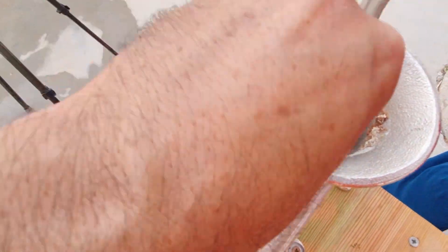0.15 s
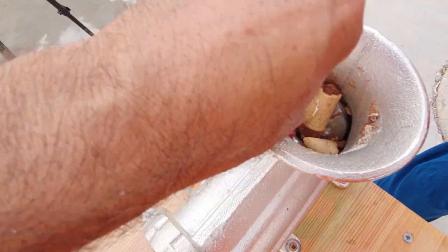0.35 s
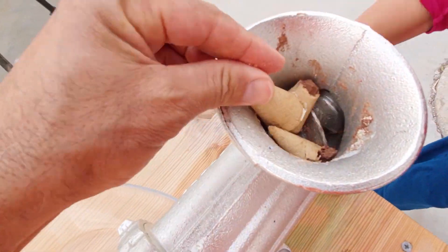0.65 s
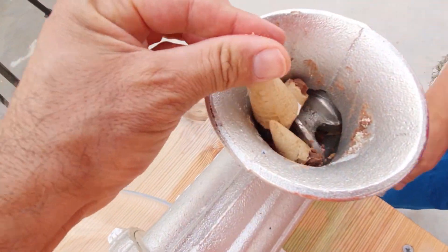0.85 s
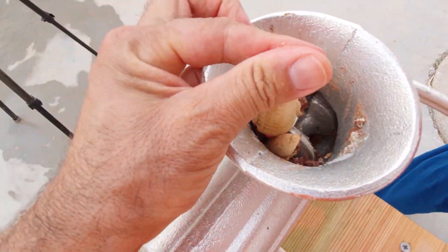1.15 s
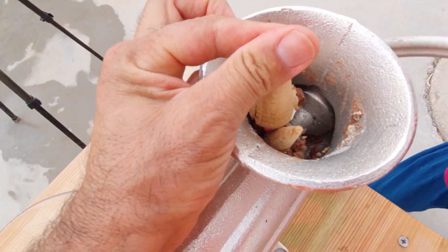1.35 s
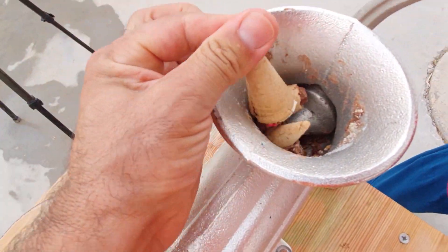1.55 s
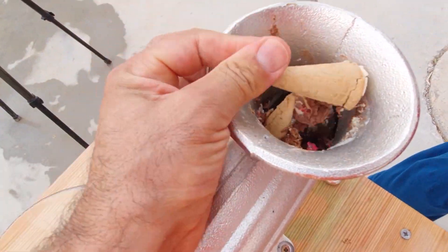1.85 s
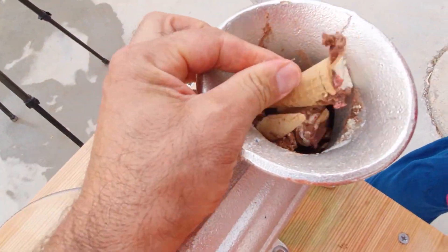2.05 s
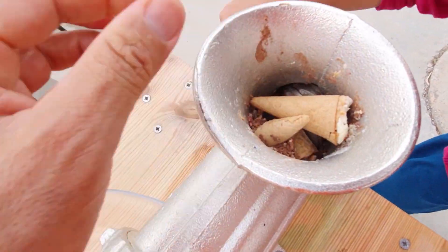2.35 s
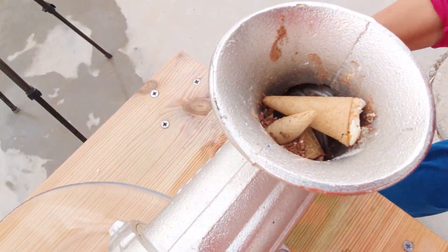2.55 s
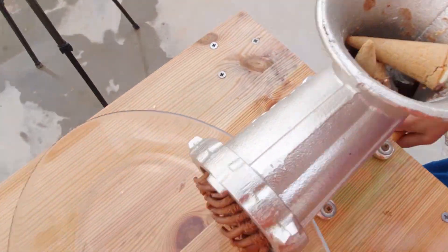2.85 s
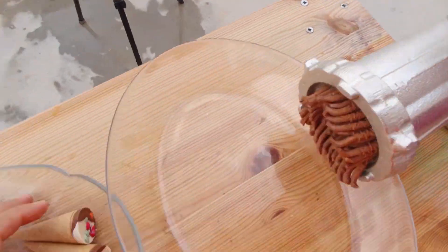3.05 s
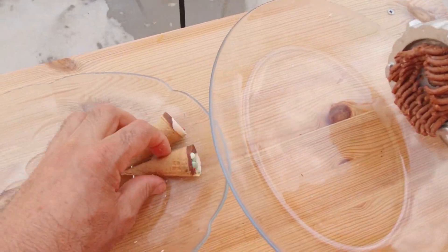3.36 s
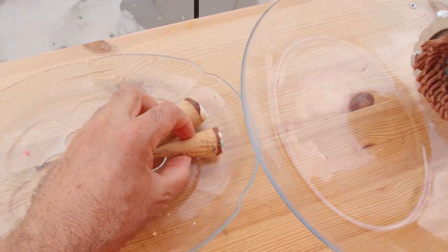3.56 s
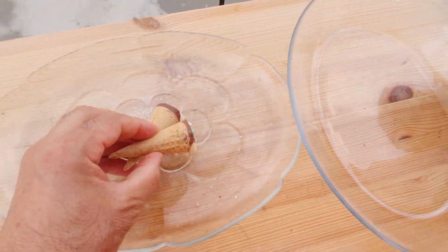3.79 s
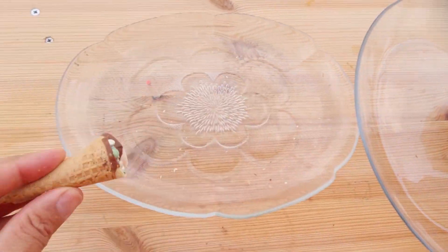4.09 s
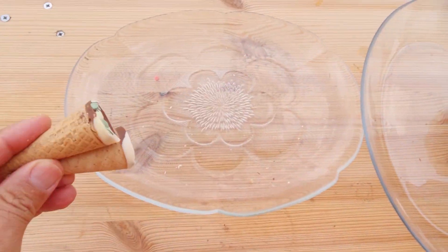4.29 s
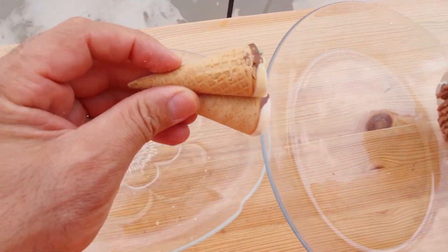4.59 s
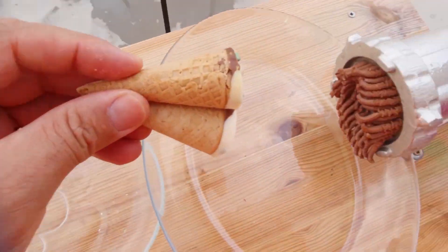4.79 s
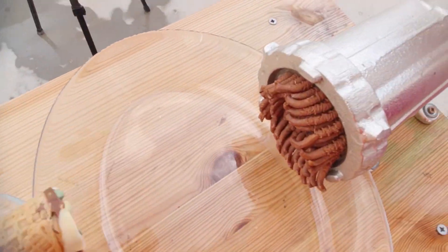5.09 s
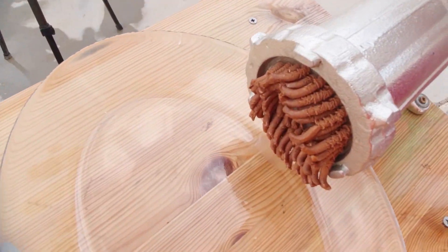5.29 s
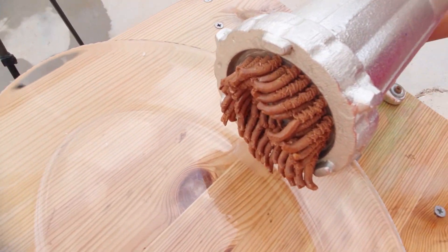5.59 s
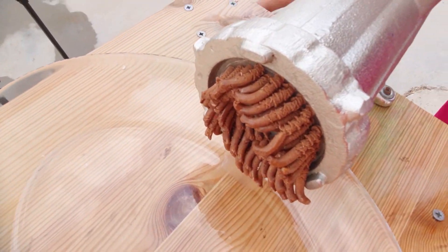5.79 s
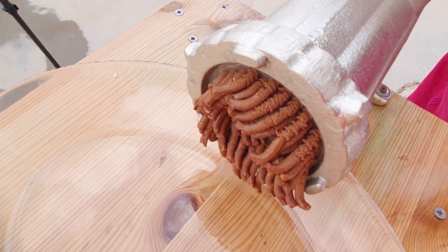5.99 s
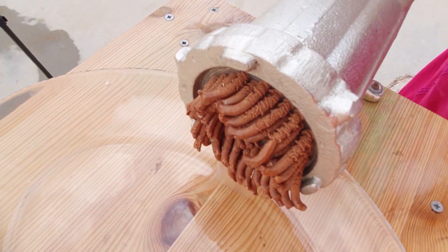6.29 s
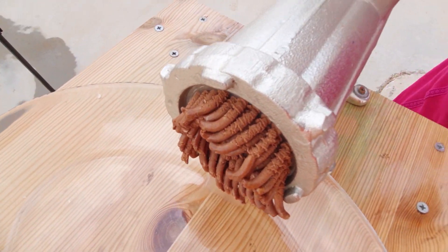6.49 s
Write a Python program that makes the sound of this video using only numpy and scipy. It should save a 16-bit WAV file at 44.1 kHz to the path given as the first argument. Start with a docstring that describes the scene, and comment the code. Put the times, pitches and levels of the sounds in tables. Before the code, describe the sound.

Close, dry crackling of wafers crushed by a metal auger, a cone dropping, table thumps and glass knocks, then a burst of dense crunches.

```python
"""At a wooden table, close to the microphone, wafer cones are fed into a clamped, hand-cranked metal meat grinder.
Slipping noise through metal resonances makes the auger rub in chocolate paste; crumbs are clustered noise grains
and snapping wafer walls are millisecond bursts. A cone drops into the hopper and a hand bumps the table while
taking more cones from a glass plate: pushes ringing sets of modes, with rasps, squeaks and shaped noise.
Slow swells of low noise are puffs of air on the microphone."""
import sys
import numpy as np
from scipy import signal
from scipy.fft import rfft, irfft
from scipy.io import wavfile
from scipy.ndimage import uniform_filter1d

SR = 44100
rng = np.random.default_rng(int(sys.argv[2]) if len(sys.argv) > 2 else 0)


def generate_wav(signal):
    """Clip the signal to [-1, 1] and save it as 16-bit WAV at the path in sys.argv[1]."""
    frames = np.transpose(np.atleast_2d(signal))
    scaled = np.clip(frames, -1, 1) * 32767
    pcm = np.round(scaled).astype(np.int16)
    wavfile.write(sys.argv[1], SR, pcm)


N = 292824
T = np.arange(N) / SR  # seconds

# The loudest wafer walls breaking. Each row: time in seconds, relative level in dB,
# treble and low-mid in dB relative to that level.
SNAPS = [(0.0303, -20, -21, -4.5), (0.0392, -19, -0.5, -10), (0.2633, -21, -6, -8), (0.3398, -29, 7.5, 0.5),
         (0.4114, -34.5, 6, -14), (0.838, -22, -3, -5.5), (0.8571, -28, 0, -14), (0.9653, -21.5, -17, -24),
         (1.0847, -21.5, -3, -5), (1.094, -26.5, 8, -7), (1.208, -30.5, -2, -10), (1.476, -27, 8, -7),
         (1.5848, -31.5, 4, -13), (1.6438, -31, 9, -16), (1.7002, -23.5, 7, -5.5), (1.7105, -24, 6, -11),
         (1.724, -14, -0.5, -9.5), (1.7341, -18.5, 2, -9), (1.7498, -23, 1, -20), (1.7594, -21.5, 6.5, -25),
         (1.7737, -20.5, 13, -23), (1.7809, -10.5, 2, -12.5), (1.797, -22, -3, -4),
         (1.824, -18.5, -3, -2.5), (1.8322, -8.5, -6, -24), (1.8403, -8.5, -3, -21),
         (1.8832, -19.5, 0, -11), (1.8856, -21.5, 4, -1), (1.9859, -24.5, 7, -9), (2.0718, -23, -6, -0.5),
         (2.1331, -31.5, 6, -14), (2.5283, -29.5, 3, 6), (2.6485, -44, -10, 7.5),
         (2.9973, -24.5, -10, -11.5), (3.1193, -17, -7.5, -8), (3.4423, -31.5, -14, -8.5),
         (4.9225, -33, -5, -17), (4.9588, -20.5, -11, -33), (5.0092, -29.5, -6, 0), (5.018, -26, -14, -5),
         (5.048, -21, -22, -0.5), (5.0532, -26, 4.5, -3), (5.0925, -31.5, -7, 0.5), (5.133, -32.5, -2, 9),
         (5.2019, -24.5, -7, 0.5), (5.277, -18.5, -3.5, -10), (5.3016, -6.5, -11, -2),
         (5.3082, -16, -14, -20), (5.3137, -8.5, -25, -11), (5.3391, -20, -6, -10), (5.362, -14, -15, -9),
         (5.3751, -14.5, -11, -7), (5.381, -11, -2, -8), (5.4473, -14, -2.5, -5.5), (5.4608, -16, -10, -8),
         (5.4862, -16, -7, -9), (5.4967, -15, -14, -12), (5.516, -16.5, -7, -6), (5.555, -14.5, -11, -7),
         (5.6235, -17, -12, -10.5), (5.8164, -33, -16, 1), (5.894, -14, -4, -1), (5.8958, -11, -26, -7),
         (5.9013, -26.5, 4, 11.5), (5.9146, -27, -17, 6.5), (5.9346, -34, -8, -3), (5.9495, -22, -18, -10),
         (5.9694, -23, -7, -17), (5.975, -8.5, -7.5, -13.5), (6.0039, -19.5, -11, 9.5),
         (6.1927, -19.5, -3, -15), (6.2129, -26.5, -14, -1), (6.3588, -22.5, -26, -8),
         (6.3946, -14.5, -36, -17), (6.401, -19.5, -35, -1.5), (6.5232, -26.5, -12, -2),
         (6.6035, -19, -10, -11)]
# The auger jolts its housing as a cone gives way. Each row: start in seconds, relative level in dB.
JOLTS = [(0.04, -33.5), (0.178, -40.5), (0.338, -43.5), (1.085, -34), (1.723, -32.5), (5.047, -36),
         (5.203, -34.5), (5.275, -38), (5.302, -18.5), (5.339, -40), (5.363, -26), (5.403, -28.5),
         (5.46, -32.5), (5.508, -33), (5.545, -27), (5.579, -35), (5.62, -29), (5.64, -28.5), (5.748, -38),
         (5.813, -43), (5.894, -31.5), (6.005, -39), (6.235, -37)]
# Modes of the wooden table. Each row: frequency in Hz, relative level in dB, time to fade by 60 dB in seconds.
TABLE = [(45.6, -27.5, 0.42), (135.8, -1.5, 0.2), (260, -2, 0.078), (292, 7.5, 0.034), (350, 1.5, 0.098),
         (410, -22, 0.084), (650, -40, .1)]
# Low rumble of the table. Each row: frequency in Hz, relative level in dB.
RUMBLE = [(25, -28), (60, -9), (130, 2.5), (190, -12.5), (260, 0), (310, 1), (400, -9.5), (480, -1.5),
          (580, -23.5), (900, -49), (2000, -45)]
# Hiss of the finest splinters. Each row: frequency in Hz, relative level in dB.
TOP_CRACK = [(3000, -90), (7000, -13.5), (10000, 5), (12500, 2), (16000, 5.5)]


def undb(db):
    """Decibels to gain."""
    return 10 ** (np.asarray(db) / 20)


def unit(x):
    """Scale to rms 1."""
    return x / np.sqrt(np.mean(x ** 2) + 1e-18)


def add(out, s, x):
    """Mix x into out from time s."""
    i = max(int(s * SR), 0)
    part = x[..., :max(N - i, 0)]
    out[..., i:i + part.shape[-1]] += part


def colour(x, points, size=4096):
    """Causal minimum-phase filter with the given (Hz, dB) outline."""
    hz, db = np.transpose(points)
    grid = np.maximum(np.fft.rfftfreq(size, 1 / SR), 1)
    outline_db = np.interp(np.log(grid), np.log(hz), db)
    # folding the cepstrum on to positive time puts the energy as early as possible
    cepstrum = irfft(np.log(undb(outline_db)))
    cepstrum[1:size // 2] *= 2
    cepstrum[size // 2 + 1:] = 0
    response = irfft(np.exp(rfft(cepstrum)))
    return signal.oaconvolve(x, response[None], axes=-1)[:, :x.shape[-1]]


def pair(likeness, size=N):
    """Left and right noise that are partly the same."""
    shared = np.clip(likeness, 0, 1)
    noise = rng.standard_normal((3, size))
    return np.sqrt(shared) * noise[0] + np.sqrt(1 - shared) * noise[1:]


def walk(rate):
    """Smooth random wander with spread 1, heading for a new value `rate` times a second."""
    k = max(int(SR / rate), 1)
    steps = np.repeat(rng.standard_normal(N // k + 1), k)
    return unit(uniform_filter1d(steps, k)[:N])


def swell(length_s):
    """A rounded rise and fall."""
    return np.sin(np.linspace(0, np.pi, int(length_s * SR) + 1))


def grains(rate, spread_db, decay_s, bed):
    """Envelope of many tiny fractures of uneven size over an even bed of friction."""
    sizes = undb(spread_db * np.minimum(rng.exponential(size=N), 4))
    hits = (rng.random(N) < rate / SR) * sizes ** 2
    power = signal.lfilter([1], [1, -np.exp(-1 / (decay_s * SR))], hits)
    return unit(np.sqrt(power / power.mean() + abs(bed)))


def resonate(x, modes):
    """Broad resonances side by side, each filtered twice for steep skirts."""
    out = 0
    for hz, width, db in modes:
        b, a = signal.iirpeak(hz, hz / (2 * width), SR)
        once = signal.lfilter(b, a, x)
        out = out + undb(db) * signal.lfilter(b, a, once)
    return unit(out)


def ring(modes):
    """Impulse response of a set of decaying modes."""
    t = T[:SR // 2]
    return sum(undb(db) * np.exp(-np.log(1000) * t / t60) * np.cos(2 * np.pi * hz * t) for hz, db, t60 in modes)


def strike(blows, modes):
    """Half-sine pushes ring a set of modes; a longer contact is duller."""
    force = np.zeros(N)
    for s, db, contact_s in blows:
        push = np.sin(np.pi * np.minimum(T[:SR // 50] / contact_s, 1))
        add(force, s, undb(db) * push / push.sum())
    return signal.fftconvolve(force, ring(modes))[:N]


def air():
    """Faint room tone, and soft puffs of low noise that hit each microphone port on its own."""
    # Puffs of air. Each row: start in seconds, length in seconds, left and right level in dB.
    puffs = [(0.026, 0.2, -29, -40.5), (2.263, 0.079, -64, -33.5), (2.334, 0.099, -64, -24.5),
             (2.418, 0.073, -60, -34), (2.492, 0.048, -52, -30), (5.704, 0.21, -32.5, -46),
             (6.037, 0.1, -37, -52)]
    # Spectrum of the room. Each row: frequency in Hz, relative level in dB.
    room_tone = [(25, -14.5), (70, 5), (150, -12), (300, -10.5), (680, -10), (1100, -31), (1600, -23),
                 (2000, -21), (4000, -28.5), (16000, -39.5)]
    gust = np.zeros((2, N))
    for s, length_s, left_db, right_db in puffs:
        add(gust, s, undb([[left_db], [right_db]]) * swell(length_s))
    buffet = unit(colour(pair(0), [(25, -17), (60, 5), (110, 2.5), (160, -12.0), (260, -31.0), (900, -62)]))
    tone = unit(colour(pair(0.73), room_tone))
    return buffet * gust + undb(-55.0) * tone


def room(x, t60_s, wet_db):
    """Weak, quickly fading reflections from the table and walls, as a decaying noise tail after 4 ms."""
    t = T[:SR // 2]
    tail = pair(0, size=len(t)) * np.exp(-np.log(1000) * t / t60_s) * (t > .004)
    tail = tail / np.linalg.norm(tail, axis=1, keepdims=True)
    return x + undb(wet_db) * signal.fftconvolve(x, tail, axes=-1)[:, :N]


def drags():
    """The hand shifts the plate, and the table top rumbles under it."""
    # Hand and plate drag on the table. Each row: start in seconds, length in seconds, level in dB.
    strokes = [(2.975, 0.28, -46.5), (3.256, .2, -38), (3.428, 0.17, -37), (3.516, 0.26, -42),
               (4.47, 0.37, -44.5)]
    pressure = np.zeros(N)
    for s, length_s, db in strokes:
        add(pressure, s, undb(db) * swell(length_s))
    return unit(colour(pair(0.74), RUMBLE)) * pressure


def scuffs():
    """The waffle pattern rasps on the glass, and rubbing surfaces give short wavering squeaks."""
    # Cones slide over the glass plate. Each row: start in seconds, length in seconds, relative level in dB.
    slides = [(3.274, 0.076, -52), (3.355, 0.055, -43.5), (3.518, 0.054, -39.5), (3.636, 0.071, -41),
              (4.207, 0.082, -53.5)]
    # Faint squeaks. Each row: start in seconds, length in seconds, start and end pitch in Hz, level in dB.
    squeals = [(3.273, 0.11, 3650, 3450, -49), (3.89, 0.16, 5550, 4907, -61.5),
               (4.482, 0.33, 2125, 1927, -55.5)]
    # Spectrum of the rasp. Each row: frequency in Hz, relative level in dB.
    rasp_outline = [(500, -12.5), (1200, -23), (1800, -3.5), (2700, -4.5), (3700, -8.5), (5200, 3),
                    (7500, -11.5), (10000, -10), (15000, -11)]
    # Ringing of the plate. Each row: frequency in Hz, half bandwidth of one filter pass in Hz, relative level in dB.
    glass = [(2680, 55, -8), (4890, 96, 0), (5420, 90, -6.5), (6090, 110, 0.5), (6330, 85, 6),
             (7440, 130, 2.5)]
    pressure, squeaks = np.zeros(N), np.zeros(N)
    for s, length_s, db in slides:
        add(pressure, s, undb(db) * swell(length_s))
    for s, length_s, start_hz, end_hz, db in squeals:
        grip = swell(length_s)
        waver = 1 + .028 * walk(640)[:len(grip)]
        hz = np.linspace(start_hz, end_hz, len(grip)) * waver
        add(squeaks, s, undb(db) * grip * np.sin(2 * np.pi * np.cumsum(hz) / SR))
    rasp = unit(colour(pair(0.15) * undb(3.5 * walk(500)), rasp_outline))
    glassy = resonate(rasp, glass)
    return (undb(-1.0) * rasp + undb(-7.5) * glassy) * pressure + squeaks


def plate_knocks():
    """A cone knocks on the glass plate and rings its modes."""
    # Knocks. Each row: start in seconds, relative level in dB, contact time in seconds.
    knocks = [(3.374, -41, 0.00054), (3.386, -23.5, 0.00053), (3.533, -52, 0.00038)]
    # Modes of the plate. Each row: frequency in Hz, relative level in dB, time to fade by 60 dB in seconds.
    plate = [(378, 4, 0.056), (867, -14, 0.057), (1062, -5, 0.044), (1085, -25, 0.3), (1450, 1.5, 0.031),
             (1580, -12, 0.047), (1600, -24, .03), (2650, 1, 0.12)]
    return strike(knocks, plate)


def bumps():
    """The hand bumps the plate and the table under it, ringing the wood."""
    # Bumps. Each row: start in seconds, relative level in dB, contact time in seconds.
    blows = [(3.215, -15, 0.0024), (3.2215, -7.5, 0.0034), (3.244, -13, 0.0047), (3.315, -23, 0.003),
             (3.385, -43, 0.00082), (3.475, -39, 0.0016), (3.503, -38, 0.0015), (3.532, -35, 0.0008),
             (3.630, -39, 0.0017), (4.512, -21, 0.0067), (4.545, -38, 0.0028)]
    return strike(blows, TABLE)


def collapse(s, start_hz, end_hz, fall_s, length_s, db):
    """A hollow cone caves in: a rough crunch that falls quickly in pitch."""
    body = swell(length_s) ** 2
    hz = end_hz + (start_hz - end_hz) * np.exp(-T[:len(body)] / fall_s)
    hz = hz * (1 + 0.12 * walk(1500)[:len(body)])
    grit = undb(0.39 * walk(930)[:len(body)])
    # the level sinks along with the pitch
    envelope = undb(db) * np.sqrt(body * hz / start_hz) * grit
    out = np.zeros(N)
    add(out, s, envelope * np.sin(2 * np.pi * np.cumsum(hz) / SR))
    return out


def drops(decay_s):
    """A cone gives way, rings the hopper and lands with a dull crunch in the paste."""
    # A cone falls into the hopper. Each row: start in seconds, relative level in dB, contact time in seconds.
    falls = [(1.8487, -19.5, 0.00019), (1.857, -51, 0.0015)]
    # Modes of the hopper. Each row: frequency in Hz, relative level in dB, time to fade by 60 dB in seconds.
    hopper = [(72, -1, 0.14), (136, -5, 0.109), (287, 8, 0.043), (674, 2, 0.041), (880, -18, 0.093),
              (1040, -29, 0.0097), (1900, 1.5, 0.046), (2420, -25, .03)]
    # Spectrum of the landing. Each row: frequency in Hz, relative level in dB.
    thud_outline = [(40, -10), (80, -12), (160, -23), (250, -1), (420, -44), (720, 26), (1000, 41),
                    (1500, -34), (2200, -18), (4000, -8)]
    landing = np.zeros(N)
    for s, db, contact_s in falls:
        add(landing, s, undb(db) * np.exp(-T[:SR // 10] / (decay_s + contact_s)))
    thud = unit(colour(pair(0.86), thud_outline)) * landing
    caving = collapse(s=1.842, start_hz=2393, end_hz=62.6, fall_s=0.0075, length_s=0.032, db=-21.5)
    return undb(-6.5) * strike(falls, hopper) + undb(8.0) * thud + caving


def clamp():
    """The clamp hands every jolt of the grinder on to the table top, which gives a short wooden knock."""
    # 8 dB below the jolt, with a contact of 1.5 ms
    return strike([(s, db - 8, 0.0015) for s, db in JOLTS], TABLE)


def jolts(decay_s):
    """The grinder shudders as a cone gives way: a short dull crunch of decaying noise."""
    # Spectrum of a jolt. Each row: frequency in Hz, relative level in dB.
    jolt_outline = [(40, -4.5), (130, -18.5), (190, -20), (280, 6.5), (480, -1), (580, -15.5), (750, -13.5),
                    (1050, -8.5), (1420, -7.5), (1900, -15.5), (3000, -22.5), (6000, -37)]
    push = np.zeros(N)
    fade = np.exp(-T[:SR // 10] / decay_s)
    for s, db in JOLTS:
        add(push, s, undb(db) * fade)
    return undb(1.5) * unit(colour(pair(0.76), jolt_outline)) * push


def swing():
    """Where the microphone is: 0 over the hopper, 1 in front of the die."""
    return np.clip((T - 2.8) / .6, 0, 1)


def effort():
    """Crackle, fizz, rub and scrape in relative dB: the slow load, plus a rise and fall for each crunch."""
    # How hard the grinder works. Each row: time in seconds, then relative levels in dB of the paste pressed
    # by the auger, the crumbs caught in it and the scrape of the bare barrel.
    load = [(0, -43.5, -39.5, -43), (0.2, -57, -39.5, -45.5), (0.6, -42.5, -41.5, -36.5),
            (0.72, -43.5, -41.5, -43.5), (1.2, -45.5, -41, -47), (1.47, -62, -53, -60),
            (1.65, -54.5, -39, -58), (1.92, -47, -43.5, -40.5), (2.3, -50, -44.5, -49.5),
            (2.62, -68.5, -53.5, -56.5), (2.92, -55, -51.5, -55.5), (3.14, -55.5, -52.5, -57),
            (3.25, -61.5, -54, -63), (3.7, -49.5, -52, -49), (3.99, -69.5, -64, -63.5),
            (4.25, -49.5, -61.5, -46.5), (4.88, -54.5, -49.5, -53.5), (5.22, -45, -46, -41),
            (5.48, -39, -37, -49), (5.71, -45, -47.5, -44.5), (6.15, -51.5, -46.5, -50.5),
            (6.64, -38.5, -41, -40)]
    # A piece of wafer is caught and crumbles. Each row: start in seconds, length in seconds, then relative
    # levels in dB of the crackle, the fizz of fine splinters and the strain on the auger.
    crunches = [(0.01, 0.17, -36, -35, -42), (0.25, 0.12, -36.5, -31, -44.5), (0.484, 0.24, -36, -37, -42),
                (0.83, 0.099, -38.5, -46, -66), (1.082, 0.04, -32.5, -41, -36),
                (1.684, 0.16, -39, -33, -69), (1.805, 0.057, -29, -22, -47),
                (1.87, 0.22, -41.5, -37.5, -61), (2.094, 0.18, -43, -37.5, -64),
                (2.503, 0.056, -43, -42, -58), (4.697, 0.11, -56, -51, -57), (4.96, .11, -43.5, -45, -51),
                (5.12, .1, -43, -46, -41), (5.292, 0.18, -31.5, -35, -39), (5.517, 0.14, -37, -46, -36.5),
                (5.792, 0.12, -39, -53, -46.5), (5.884, 0.062, -29.5, -49, -44),
                (5.96, 0.24, -42, -44.5, -53), (6.199, 0.064, -37, -56, -42), (6.369, 0.11, -34, -61, -39)]
    s, *columns = np.transpose(load)
    paste_db, crumb_db, barrel_db = (np.interp(T, s, c) for c in columns)
    slow_fizz_db = crumb_db - 1.5 - 6.5 * swing()  # duller in front of the die
    power = undb([crumb_db, slow_fizz_db, paste_db, barrel_db]) ** 2
    for start, length_s, crackle_db, fizz_db, strain_db in crunches:
        progress = np.linspace(0, 1, int(length_s * SR))
        # the first 28 % of a crunch is spent building up
        shape = np.sin(np.interp(progress, [0, 0.28, 1], [0, np.pi / 2, np.pi]))
        peaks = undb([crackle_db, fizz_db, strain_db, crackle_db - 4])
        add(power, start, np.outer(peaks, shape) ** 2)
    return 10 * np.log10(power)


def auger(rub_db, scrape_db):
    """Paste sticks and slips along the barrel, ringing the metal and shaking the table."""
    # Resonances of the loaded housing, then of the bare barrel.
    # Each row: frequency in Hz, half bandwidth of one filter pass in Hz, relative level in dB.
    housing_modes = [(676.5, 71, 6.5), (779, 160, 4), (1151, 35, -6.5), (1419, 115, -3.5)]
    barrel_modes = [(1250, 440, -4), (1930, 143, 2), (2350, 460, -2.5), (2773, 420, 4)]
    slips = grains(rate=220, spread_db=3.0, decay_s=.0012, bed=1.0)
    housing = resonate(pair(0.74) * slips, housing_modes)
    barrel = resonate(pair(0.28) * slips, barrel_modes)
    rumble = unit(colour(pair(0.96) * slips, RUMBLE))
    return housing * undb(rub_db - 3.5) + barrel * undb(scrape_db - 4.5) + rumble * undb(rub_db + 2.5)


def crumbs(crackle_db, fizz_db):
    """Crumbs are ground in uneven clusters between auger and barrel; the finest splinters fizz on top."""
    # Spectrum of the crackle. Each row: frequency in Hz, relative level in dB.
    crumb_outline = [(400, -4.5), (1200, -9.5), (2000, -2.5), (2800, -4), (3800, 1), (6000, -0.5),
                     (8000, -7.5), (10500, -11.5), (15000, -21)]
    clusters = undb(0.87 * walk(120) + 2.62 * walk(500))
    fractures = grains(rate=900, spread_db=1.5, decay_s=0.00051, bed=0.33)
    breaks = uniform_filter1d(fractures, size=24) * clusters
    crackle = unit(colour(pair(0.26) * breaks, crumb_outline))
    fizz = unit(colour(pair(.25) * breaks * undb(1.3 * walk(250)), TOP_CRACK))
    return crackle * undb(crackle_db - 4) + fizz * undb(fizz_db - 2)


def chips(crackle_db, headroom_db, count=3):
    """Every snap sheds smaller flakes just after it; a ceiling near the crackle holds their typical level."""
    gap_s, chip_db, spread_db = 0.021, -14.5, 3  # delay scale, level relative to the snap, scatter of levels
    rows = np.repeat(SNAPS, count, axis=0)
    delay, size, top, low = rng.standard_normal((len(rows), 4)).T
    s = rows[:, 0] + gap_s * (.5 + abs(delay))
    ceiling_db = np.interp(s, T, crackle_db) + headroom_db
    db = np.minimum(rows[:, 1] + chip_db, ceiling_db) + spread_db * size
    treble_db = rows[:, 2] + spread_db * top
    low_db = -8 + spread_db * low
    return np.column_stack([s, db, treble_db, low_db])


def fracture(rise_s, decay_s, tail_db, tail_s, size=1024):
    """Envelope of one break: the crack gathers speed, peaks at 2 ms, and the hopper keeps a short ring."""
    t = np.arange(size) / SR - .002
    before, after = np.minimum(t, 0), np.maximum(t, 0)
    return np.exp(before / rise_s) * (np.exp(-after / decay_s) + undb(tail_db) * np.exp(-after / tail_s))


def snaps(breaks):
    """Each break is a millisecond burst; large flakes sound lower and ring longer than fine splinters."""
    # Spectra of large flakes, then of wafer walls. Each row: frequency in Hz, relative level in dB.
    low_crack = [(300, -16), (900, -8.5), (1800, -16.5), (2700, 7.5), (3600, 5.5), (4800, -12.5),
                 (8000, -41)]
    mid_crack = [(800, -25), (2500, -22), (4000, 0), (5500, 7), (7500, 5), (10000, -5.5), (13000, -17),
                 (16000, 2)]
    s, db, treble_db, low_db = np.transpose(breaks)
    flake = fracture(rise_s=.00045, decay_s=.0011, tail_db=-30, tail_s=.02)
    wall = fracture(rise_s=.0003, decay_s=.00034, tail_db=-14, tail_s=.0022)
    splinter = fracture(rise_s=0.00014, decay_s=0.00024, tail_db=-16, tail_s=0.0028)
    parts = [(low_crack, db + low_db, flake, undb(-4.0)),
             (mid_crack, db, wall, undb(-6.0)),
             (TOP_CRACK, db + treble_db, splinter, undb(-1.5))]
    out = np.zeros((2, N))
    reference, lead_s = np.sqrt(.003 * SR), .0017  # norm of rms 1 over 3 ms; bursts begin ahead of their peak
    for outline, levels, envelope, gain in parts:
        noise = np.vstack([pair(0.11, size=len(envelope)) for _ in s])
        bursts = colour(noise * envelope, outline, size=256).reshape(len(s), 2, -1)
        for start, level_db, burst in zip(s - lead_s, levels, bursts):
            burst = burst * reference / np.linalg.norm(burst, axis=1, keepdims=True)
            add(out, start, gain * undb(level_db) * burst)
    return out


def casting(x, ring_db):
    """The metal rings faintly; the microphone swings from over the hopper round to the die."""
    # Ring of the casting. Each row: frequency in Hz, relative level in dB, time to fade by 60 dB in seconds.
    casting_modes = [(1357, -2, 0.054), (1525, -28, 0.021), (2900, -4, 0.036), (6160, 0.5, 0.08),
                     (6340, -9.5, 0.084), (6650, 8, .07), (7170, 5, 0.083)]
    # Colour over the open hopper, then in front of the die. Each row: frequency in Hz, gain in dB.
    over_hopper = [(110, -5.5), (250, -1.5), (460, -3.5), (820, 3), (1150, 0), (1600, 0), (1930, 0.5),
                   (2200, 1), (2750, -0.5), (3500, -2), (4700, 0.5), (5400, -1), (6400, 0.5)]
    before_die = [(60, 1.5), (105, -7), (160, 0), (400, -3.5), (700, 2), (950, -2.5), (1400, 2.5),
                  (1750, -1.5), (2250, 1.5), (2750, -8), (3300, -0.5), (3900, -4), (5400, -1), (7100, 0)]
    x = x + undb(ring_db) * signal.fftconvolve(x, ring(casting_modes)[None], axes=-1)[:, :N]
    return (1 - swing()) * colour(x, over_hopper) + swing() * colour(x, before_die)


def scene():
    """Grinding, breaking and handling in a small room, with air on the microphone."""
    crackle_db, fizz_db, rub_db, scrape_db = effort()
    breaks = np.vstack([SNAPS, chips(crackle_db, headroom_db=2.5)])
    wafer = snaps(breaks) + crumbs(crackle_db, fizz_db)
    grinder = wafer + auger(rub_db, scrape_db) + jolts(decay_s=0.0092)
    handling = bumps() + plate_knocks() + drops(decay_s=0.00084) + scuffs() + drags()
    direct = casting(grinder, ring_db=-55.5) + clamp() + handling
    return room(direct, t60_s=.16, wet_db=-20) + air()


def record(dry):
    """Each port adds its own resonances; peaks beyond full scale clip; the deepest bass and the top are cut."""
    # Colour of the two microphone ports. Each row: frequency in Hz, gain in dB.
    left_port = [(100, -7.5), (700, -3), (1400, 2.5), (2800, -8), (4000, -4), (7300, -4.5), (8500, -4.5),
                 (9700, -16), (11000, -17.5), (13000, -1), (16000, -36)]
    right_port = [(100, -3.5), (1300, 0), (2200, 5), (2800, 7.5), (3600, -8), (4600, 0.5), (6000, 10),
                  (7200, 10), (8300, 3.5), (9500, -22), (10600, -8.5), (12500, 7.5), (14000, 9.5),
                  (16000, -5)]
    ports = np.vstack([colour(dry[:1], left_port), colour(dry[1:], right_port)])
    ports = signal.sosfilt(signal.butter(3, 36, "high", fs=SR, output="sos"), ports)
    clipped = np.clip(ports, -1, 1)
    top_hz = 15900
    return signal.sosfilt(signal.ellip(8, .2, 80, top_hz, fs=SR, output="sos"), clipped)


dry = scene()
out = record(dry)
generate_wav(out)
```